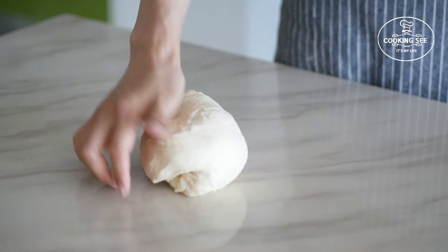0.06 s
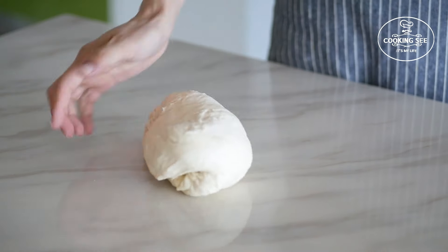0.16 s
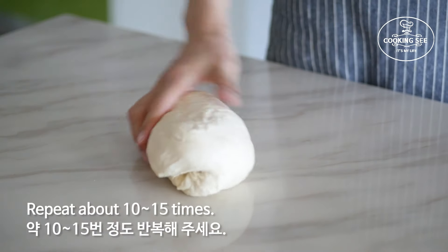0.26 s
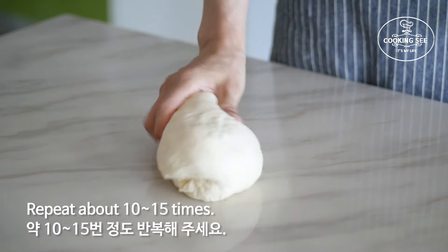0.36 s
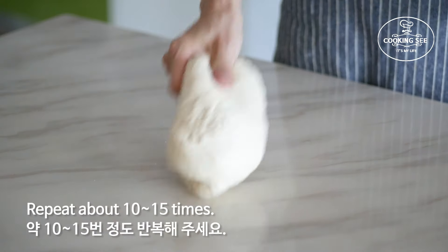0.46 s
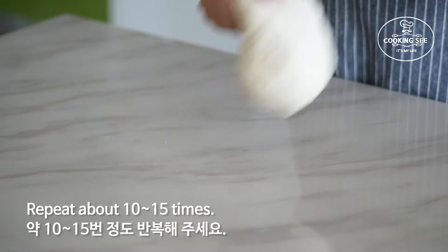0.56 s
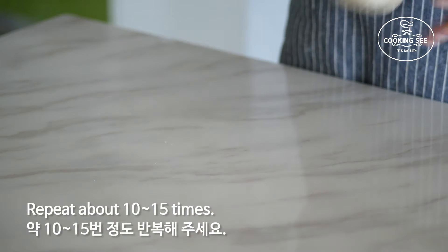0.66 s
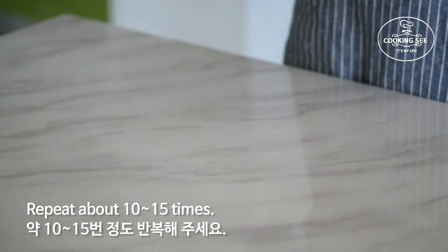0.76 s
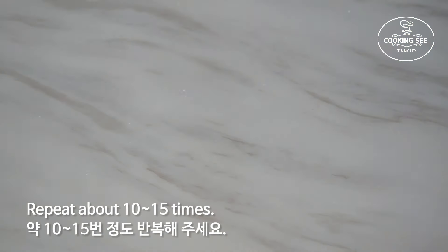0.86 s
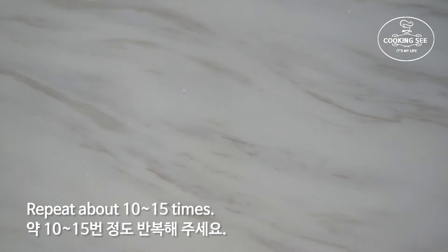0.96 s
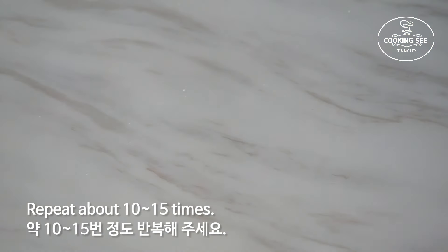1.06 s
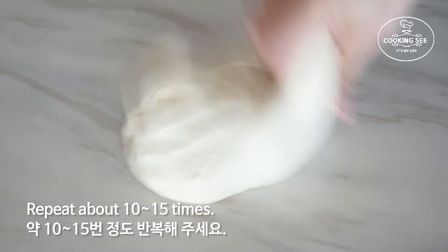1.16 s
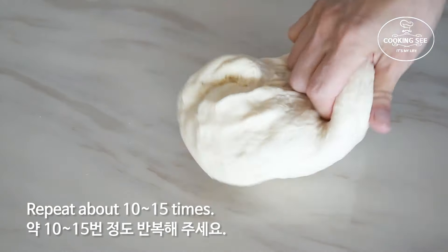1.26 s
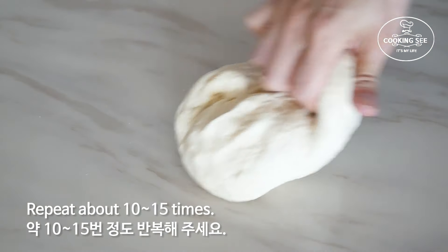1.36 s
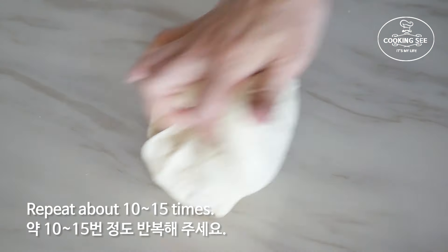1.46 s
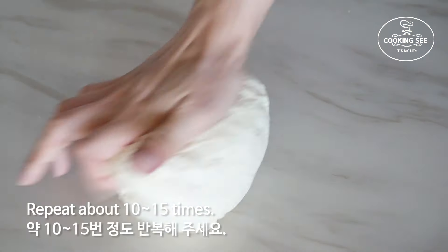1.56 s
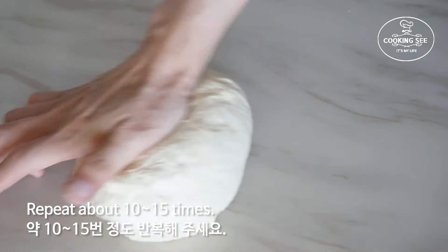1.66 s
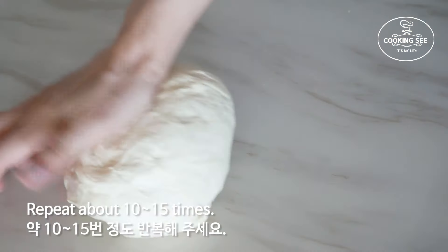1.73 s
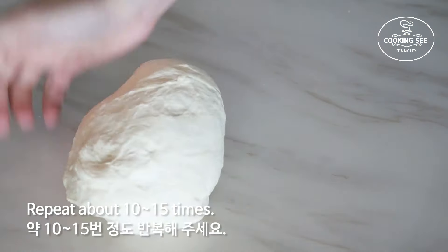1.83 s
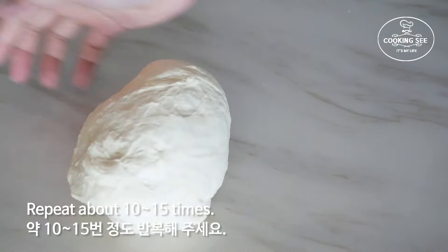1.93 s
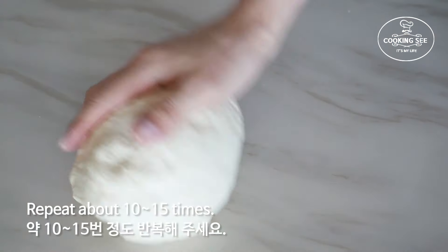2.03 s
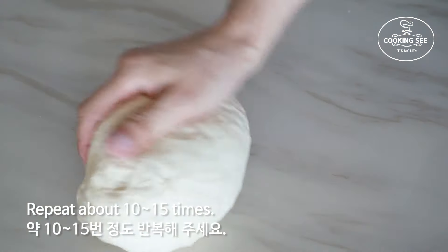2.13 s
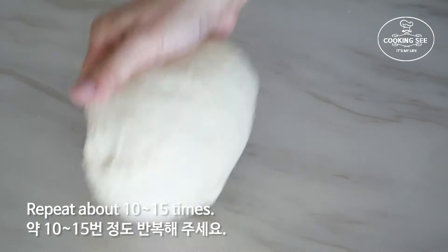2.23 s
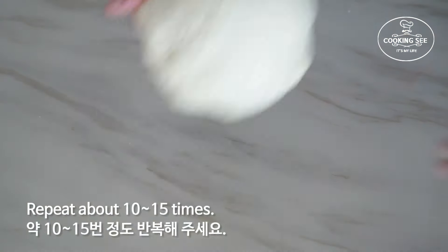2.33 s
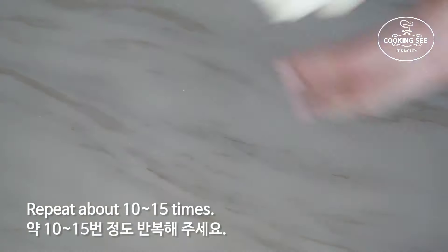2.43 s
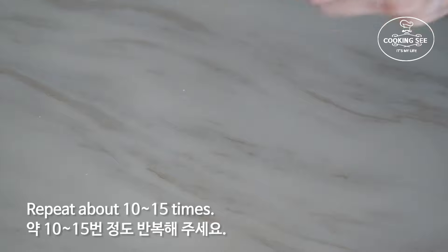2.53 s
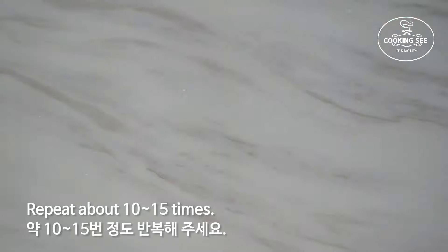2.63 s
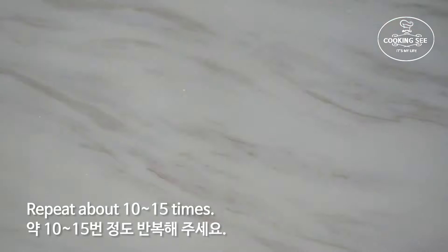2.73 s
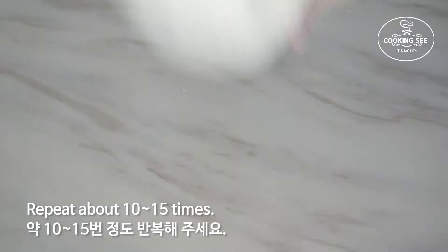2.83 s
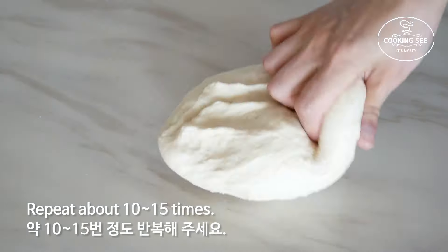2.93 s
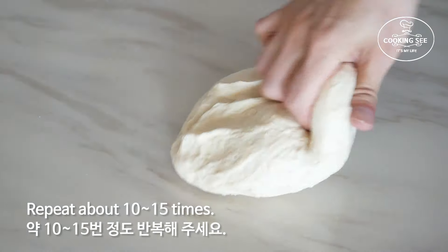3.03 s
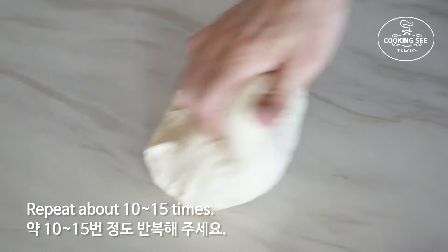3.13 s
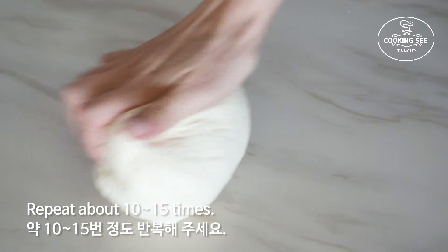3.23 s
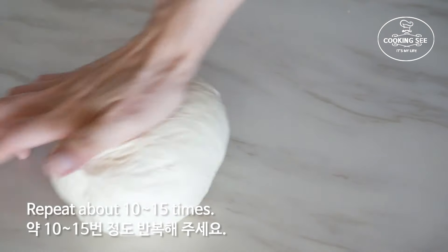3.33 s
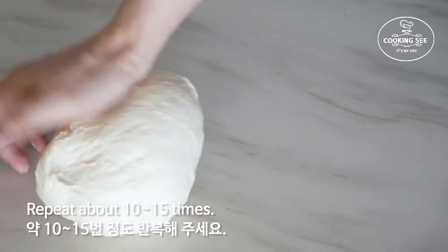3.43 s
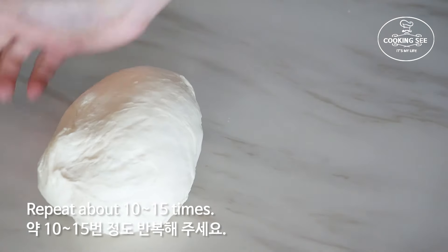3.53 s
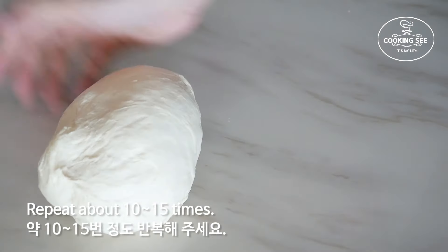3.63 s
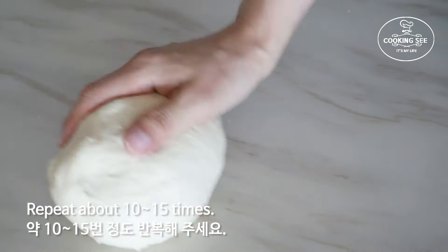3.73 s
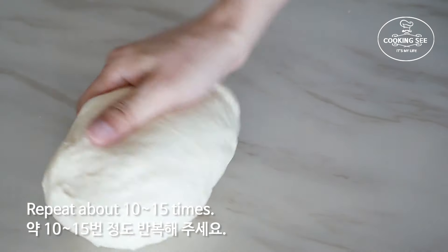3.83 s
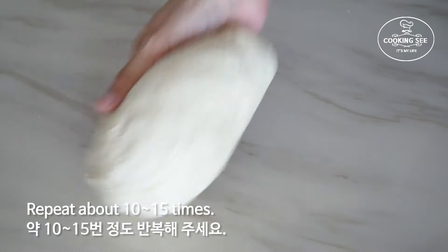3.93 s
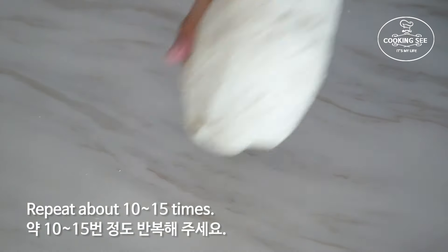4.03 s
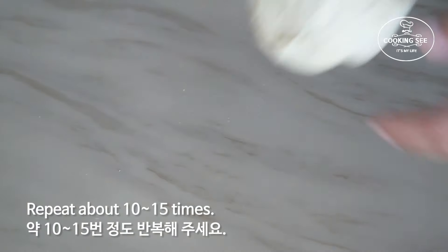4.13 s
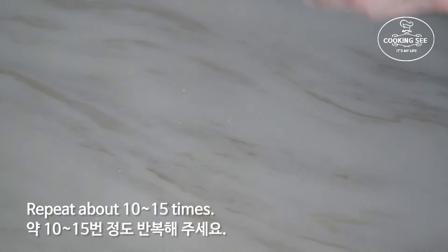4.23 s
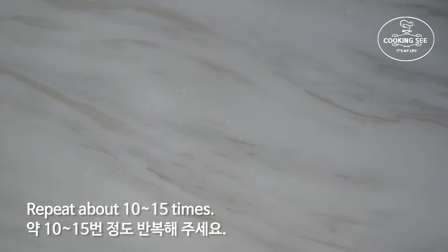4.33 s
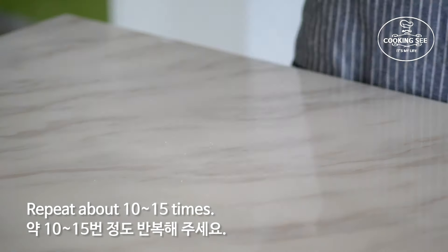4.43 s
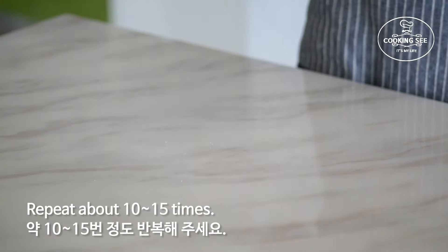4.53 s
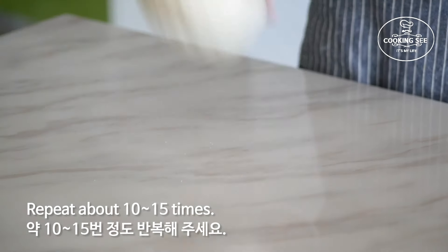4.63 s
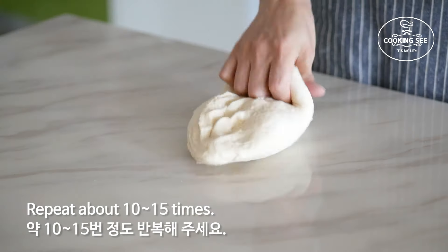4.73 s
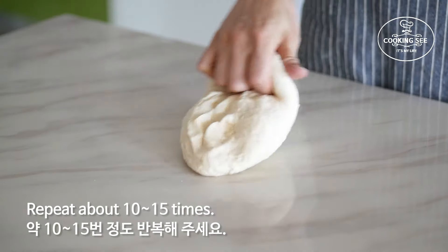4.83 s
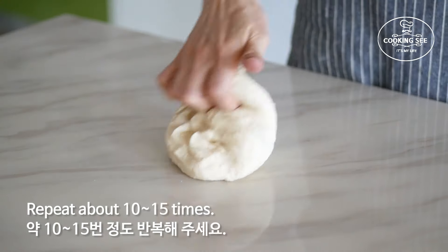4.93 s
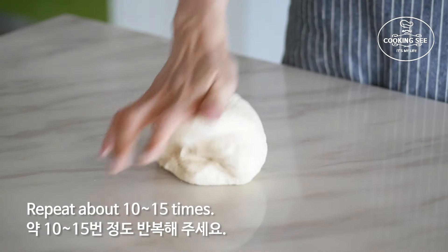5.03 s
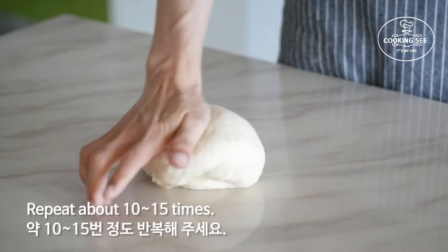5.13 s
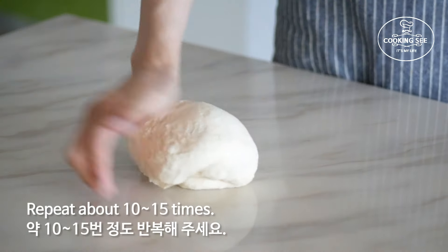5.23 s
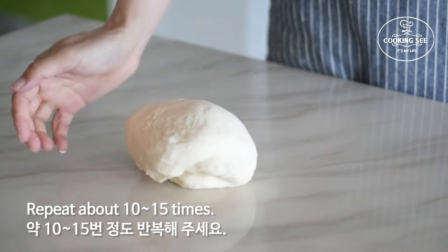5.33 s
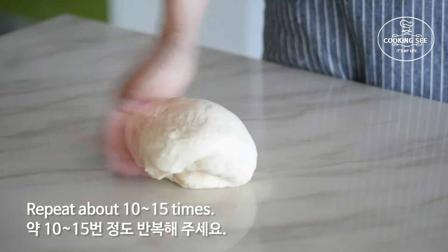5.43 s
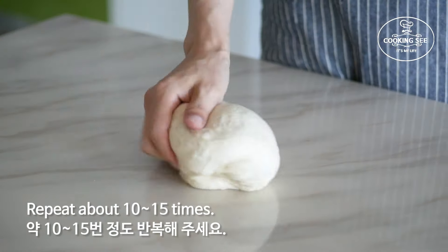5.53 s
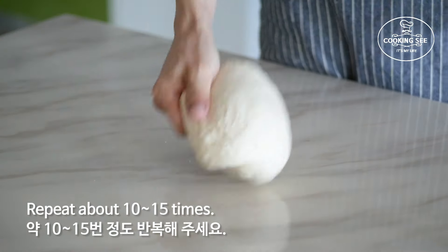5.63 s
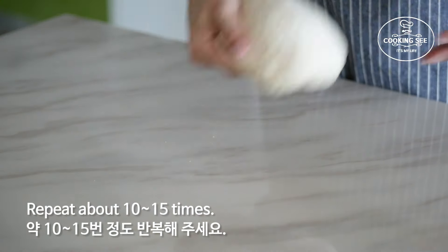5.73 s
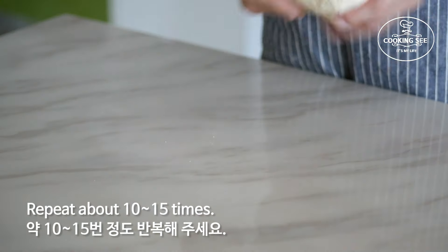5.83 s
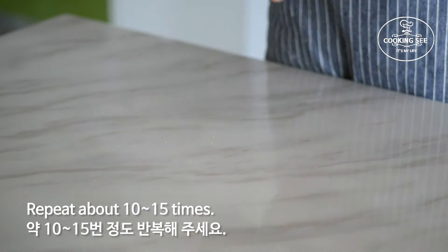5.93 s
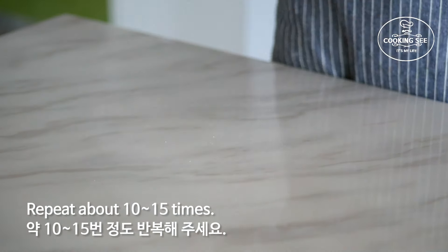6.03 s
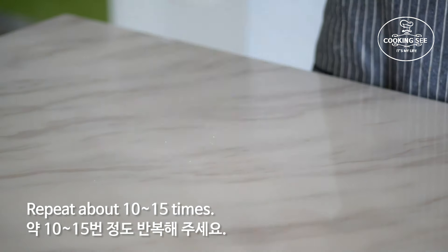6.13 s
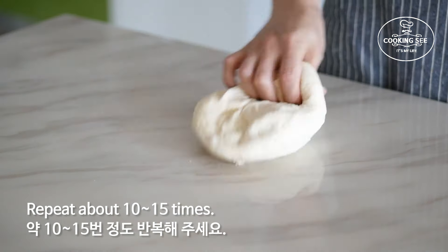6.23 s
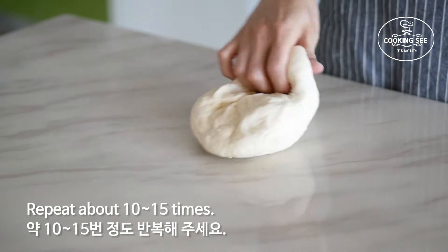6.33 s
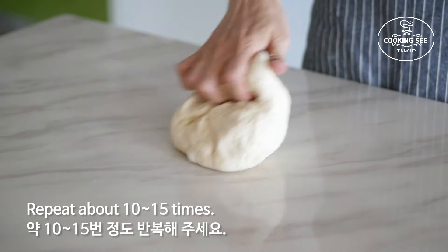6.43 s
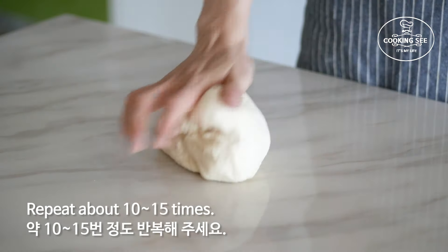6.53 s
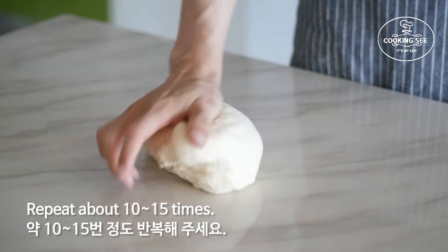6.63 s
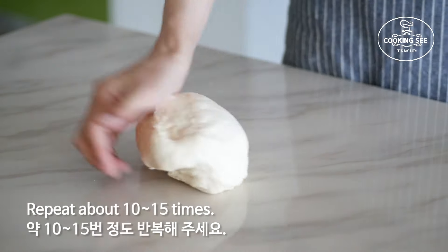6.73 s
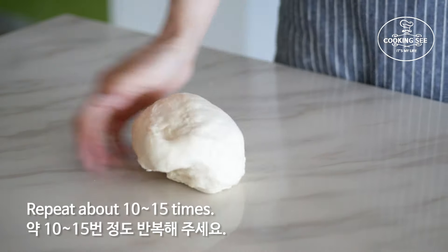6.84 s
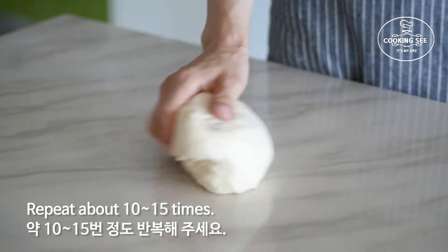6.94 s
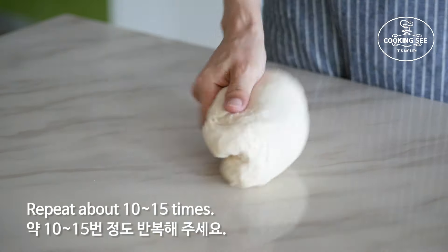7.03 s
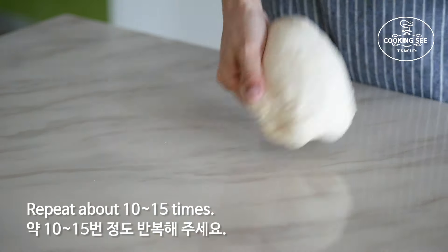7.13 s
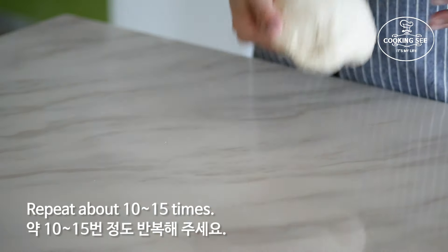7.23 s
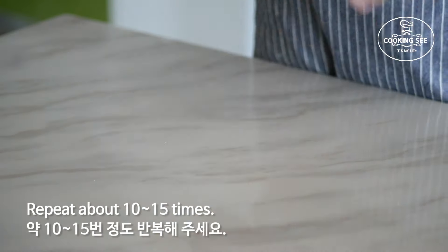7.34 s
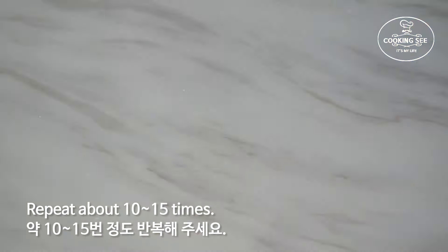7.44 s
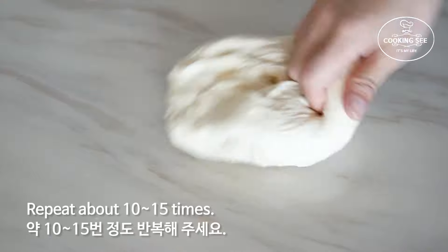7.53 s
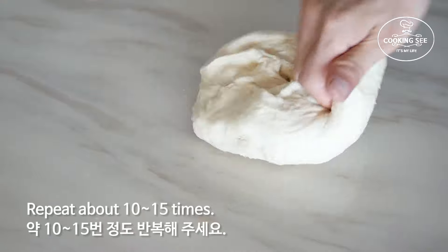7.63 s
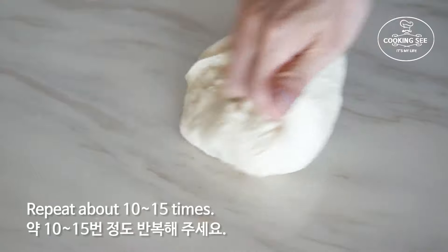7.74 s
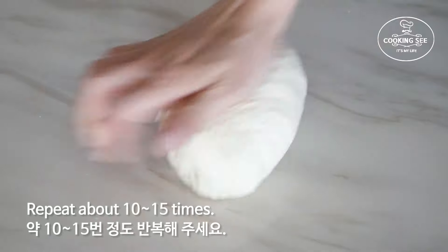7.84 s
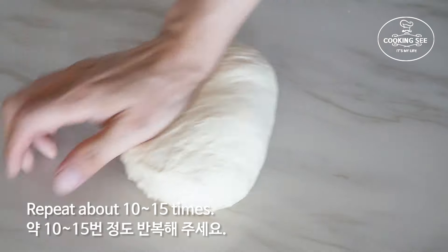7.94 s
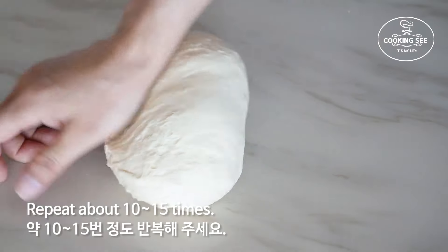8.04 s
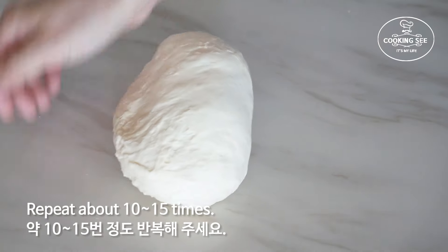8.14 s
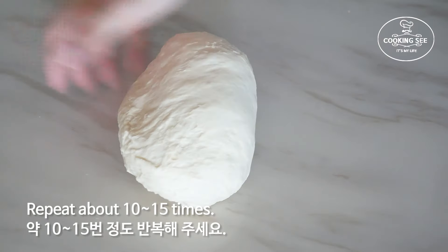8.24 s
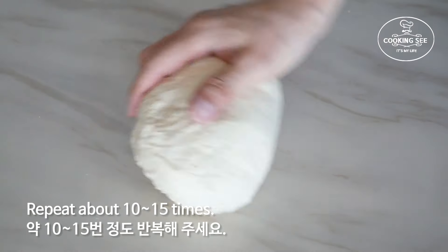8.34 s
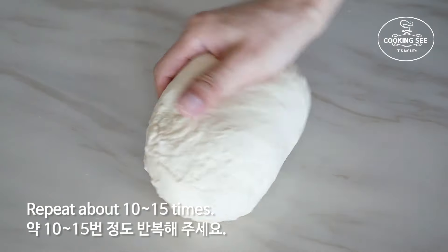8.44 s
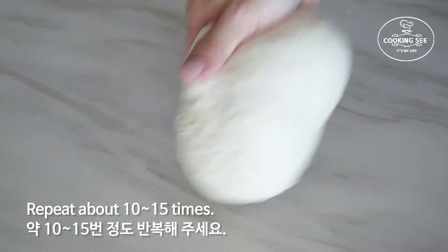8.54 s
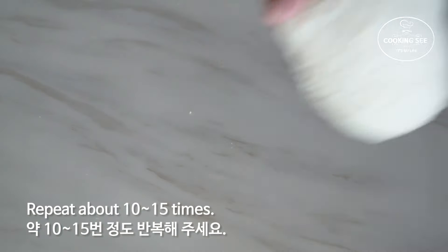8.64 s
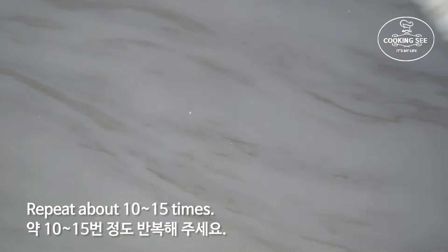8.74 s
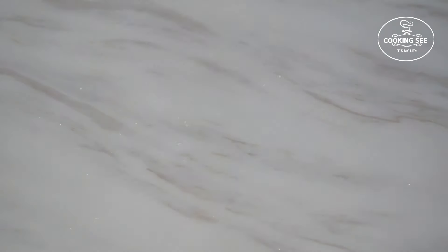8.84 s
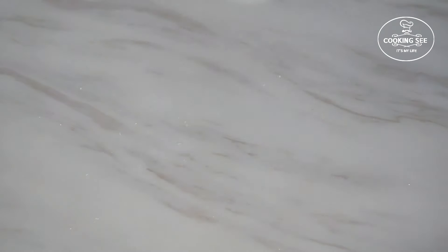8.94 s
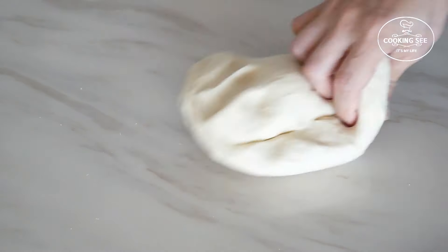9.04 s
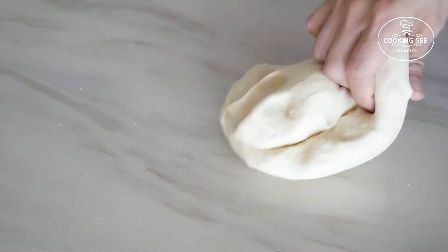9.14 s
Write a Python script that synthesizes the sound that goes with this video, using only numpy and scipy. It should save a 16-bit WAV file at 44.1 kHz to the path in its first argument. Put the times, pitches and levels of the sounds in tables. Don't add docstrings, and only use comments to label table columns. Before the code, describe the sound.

Quiet rubbing and small pats come first, then a loud wet-sounding smack of dough on stone. The cycle repeats to six slaps, the third and fourth brightest, the last softer. In between come dull drags, folding rustles, sticky fingertip ticks and one tiny peeling squeak. Hard walls echo each smack, cabinets resonate low, and a fridge hums faintly. The microphone is at arm's length.

```python
import sys
import numpy as np
from scipy import signal
from scipy.fft import rfft, irfft
from scipy.io import wavfile
from scipy.ndimage import uniform_filter1d

SR = 44100
rng = np.random.default_rng(int(sys.argv[2]) if len(sys.argv) > 2 else 0)


def ratio(d):
    e = np.asarray(d, float) / 20
    return 10 ** e


def store_wav(level_fs):
    pcm = np.round(np.clip(np.atleast_2d(level_fs), -1, 1) * 32767)
    wavfile.write(sys.argv[1], SR, pcm.T.astype(np.int16))


N = 404838
OPPOSED = np.array([[1], [-1]])

# (time [s], crackle [dB], crackle centre [Hz], knock [dB], knock [Hz])
SLAP_EVENTS = [
    (1.2491, -11, 2020, -4, 400),
    (2.958, -12, 2250, -1, 500),
    (4.7453, -6, 1620, -4, 500),
    (6.2607, -4, 2465, -4, 700),
    (7.5832, -9, 2200, -9, 400),
    (9.1654, -10, 1930, -13, 750),
]


def colour(x, points):
    hz, db = np.transpose(points)
    f = np.fft.rfftfreq(x.shape[-1], 1 / SR) + 1
    gain = ratio(np.interp(np.log(f), np.log(hz), db))
    return irfft(rfft(x) * gain, x.shape[-1])


def band(x, lo_hz, hi_hz):
    sos = signal.butter(2, [lo_hz, min(hi_hz, .45 * SR)], "band", fs=SR, output="sos")
    y = signal.sosfilt(sos, x)
    return y / np.std(y)


def walk(rate):
    k = int(SR / rate)
    levels = rng.standard_normal(N // 32)
    held = levels[np.arange(N) // k]
    return 1.27 * uniform_filter1d(uniform_filter1d(held, k), k)


def swell(t, rise):
    u = np.maximum(t, 0) / rise
    return u * np.exp(1 - u)


def ring(t, hz, rise):
    return np.sin(2 * np.pi * hz * t) * swell(t, rise)


def add(out, s, sound):
    i = int(s * SR)
    out[..., i:i + sound.shape[-1]] += sound[..., :N - i]


def pan(db):
    return ratio(np.array([[db / 2], [-db / 2]]))


def kitchen():
    # (frequency [Hz], level [dB])
    air_colour = [(15, -56.5), (25, -24.5), (65, -11.5), (213, -1), (348, -6), (567, -6.5), (615, -15.5),
                  (685, -11.5), (828, -10), (1630, -22), (6880, -32), (8090, -34), (9790, -31.5),
                  (14700, -42.5), (16400, -68.5)]
    # (frequency [Hz], level [dB])
    motor_lines = [(220.7, -57.5), (446.8, -76), (619.1, -63), (737.5, -71.5), (834.4, -74.5)]
    mid, side = colour(rng.standard_normal((2, N)), air_colour)
    air = (mid + side * OPPOSED) / np.std(mid) * ratio(-56 + 0.8 * walk(1.3))
    t = np.arange(N) / SR
    hum = 0
    for hz, db in motor_lines:
        hum = hum + ratio(db - 2.0 + 2.5 * walk(3)) * np.sin(2 * np.pi * hz * t + 1.7 * walk(6.2))
    return air + hum


def room():
    # (frequency [Hz], T60 [s])
    decay_times = [(80, 1), (210, 0.84), (560, 0.76), (1470, 0.74), (3880, 0.66), (10200, 0.59)]
    # (frequency [Hz], level [dB])
    tail_colour = [(60, 0.5), (120, -4.5), (250, 0.5), (500, -4.5), (1000, 0.5), (2000, 0.5), (4000, 0),
                   (8000, 0), (14000, -1)]
    # (frequency [Hz], level [dB])
    width = [(100, -11), (1000, -7), (4000, -10.5), (8000, -8.5), (14000, -5.5)]
    # (frequency [Hz], level [dB], T60 [s])
    cabinet_rings = [(148, -63.5, 1.1), (149, -51.5, 0.8), (219, -57, 0.4), (232, -58.5, 0.8),
                     (281, -64.5, 1.5), (286, -64.5, 1.1), (367, -73, 0.53), (457, -64.5, 0.82),
                     (593, -63, .6), (764, -69.5, 1.8)]
    tail_db, onset_s = -0.5, 0.0039
    t = np.arange(5 * SR // 4) / SR
    mid, side = rng.standard_normal((2, len(t)))
    noise = mid + colour(side, width) * OPPOSED
    hz, t60 = np.transpose(decay_times)
    tail = 0
    for centre in 45 * 2 ** np.arange(0, 8.6, .5):
        decay = ratio(-60 * t / np.interp(np.log(centre), np.log(hz), t60))
        tail = tail + np.sqrt(centre) * band(noise, centre / 2 ** .25, centre * 2 ** .25) * decay
    tail = colour(tail, tail_colour) * (1 - np.exp(-t / onset_s))
    tail *= ratio(tail_db) / np.sqrt(np.sum(tail ** 2) / 2)
    for ring_hz, db, ring_t60 in cabinet_rings:
        tail += ratio(db) * np.sin(2 * np.pi * ring_hz * t) * ratio(-60 * t / ring_t60)
    return tail


def walls():
    # (delay [ms], level [dB])
    echoes = [(3.6, -11), (5.4, -5), (7.6, -12.5), (9.5, -19), (16.3, -10.5), (17.6, -15), (19, -13.5),
              (23, -15)]
    # (frequency [Hz], level [dB])
    wall_colour = [(100, -13), (400, -10.5), (1200, -7), (3500, -2), (9000, 0), (15000, 2.5)]
    out = np.zeros((2, 2048))
    for ms, db in echoes:
        lag = ((ms + .018 * rng.standard_normal(2)) * SR / 1000).astype(int)
        out[[0, 1], lag] += ratio(db)
    return colour(out, wall_colour)


def bowl():
    # (time [s], level [dB], T60 [s], length [s])
    strikes = [
        (4.748, -43, 2.2, 0.72),
        (7.585, -40, 1.5, .8),
    ]
    bowl_hz = 1424
    out, t = np.zeros(N), np.arange(SR) / SR
    for s, db, t60, length in strikes:
        stop = np.clip((length - t) / .12, 0, 1)
        add(out, s, ratio(db - 60 * t / t60) * np.sin(2 * np.pi * bowl_hz * t) * stop)
    return out


def brushes():
    # (time [s], level [dB], half length [ms], centre [Hz])
    passes = [(2.07, -67, 10, 9000), (2.635, -61.5, 32, 10000), (4.47, -57.5, 47, 7000),
              (5.08, -50.5, 25, 8900), (5.29, -58, 30, 9000), (6.02, -59, 54, 9000), (6.6, -55, 18, 6000),
              (7.145, -57.5, 49, 10500), (7.565, -59, 12, 6000)]
    out, ms = np.zeros((2, N)), np.arange(-4096, 4096) / SR * 1000
    for s, db, half_ms, hz in passes:
        mid, side = band(rng.standard_normal((2, len(ms))), hz / 3.1, hz * 1.27)
        air = mid + 0.37 * side * OPPOSED
        add(out, s + ms[0] / 1000, ratio(db) * air * np.exp(-(ms / half_ms) ** 2))
    return out


def rubs():
    # (time of the top [s], hiss [dB], rise by 20 dB [ms], fall by 20 dB [ms], rumble re hiss [dB])
    slides = [(0.142, -53, 402, 93, 7), (0.536, -49.5, 105, 53, 4.5), (0.928, -53, 190, 22, -12),
              (1.868, -50, 210, 53, 4.5), (2.31, -48, 90, 70, 5.5), (3.4, -54, 105.5, 399, 6.5),
              (3.544, -48, 70, 37, -15), (3.978, -55, 50, 50, 11), (4.294, -60, 51, 158.5, 0),
              (4.474, -54.5, 149.5, 109, -4), (5.13, -52.5, 60, 298.5, 15), (5.288, -52.5, 53, 79.5, -15),
              (5.7, -53.5, 148, 70, 5.5), (6.104, -54, 300, 37, -7), (6.6, -58, 40, 80, 20),
              (7.0, -53.5, 50, 342, 6), (7.57, -49.5, 39, 12, 5), (7.98, -65.5, 53, 80, 18.5),
              (8.142, -58, 52, 90, 1), (8.596, -56, 300, 143.5, 6.5), (8.846, -63, 50, 149.5, -3),
              (9.114, -58, 180, 150, -8)]
    # (time of the top [s], hiss [dB], rise by 20 dB [ms], fall by 20 dB [ms], rumble re hiss [dB])
    drags = [(0.328, -44.5, 58, 70, 5.5), (0.788, -47, 0, 80, 8), (1.6, -64.5, 100, 120, 16),
             (1.67, -52, 6, 71, 13), (2.092, -45.5, 30, 96, 11), (2.548, -46.5, 14, 148.5, 5.5),
             (3.768, -41.5, 30.5, 80.5, 10.5), (4.008, -47, 12, 102, -4), (4.74, -37.5, 5, 4, 4),
             (5.498, -51, 35, 39, 8), (5.528, -42.5, 48.5, 90, 0), (5.902, -49.5, 22, 122, 3.5),
             (6.82, -53, 145.5, 60, -3), (6.936, -38.5, 12.5, 52, 0), (7.432, -45, 11, 16, -8),
             (8.062, -51.5, 67, 123, 17), (8.366, -46, 44, 106, 5)]
    slide_air_db, drag_air_db = -2, -6
    linger, resting_db = 1.11, -66
    ms = np.arange(N) / SR * 1000
    levels = np.zeros((3, N))
    levels[1] = ratio(resting_db - 5)
    for strokes, air_db in ((slides, slide_air_db), (drags, drag_air_db)):
        for s, db, rise_ms, fall_ms, low_db in strokes:
            near = slice(max(int((s - .6) * SR), 0), int((s + .7) * SR))
            late = ms[near] - 1000 * s
            fade_db = -20 * np.maximum(-late / rise_ms, late / fall_ms)
            shapes_db = np.array([fade_db - 3.5, fade_db / linger + low_db - 8, fade_db + air_db - 8.5])
            levels[:, near] += ratio(db + shapes_db)
    grain = rng.standard_normal(N) * ratio(3.2 * walk(400) + 2.3 * walk(45))
    shake = rng.standard_normal(N)
    rumble = (.62 * band(shake, 160, 370) + .72 * band(shake, 380, 850)) * ratio(4.2 * walk(30))
    layers = np.array([band(grain, 990, 5600), rumble, band(grain, 3400, 10000)])
    levels = uniform_filter1d(levels, int(0.0052 * SR), axis=1)
    return pan(1.4) * np.sum(levels * layers, axis=0)


def squeak():
    # (from [Hz], to [Hz], glide [ms], length [ms], level [dB])
    from_hz, to_hz, glide_ms, length_ms, db = (4800, 3401, 8.5, 25.5, -35)
    # (frequency [Hz], level [dB])
    squeak_colour = [(2500, -29.5), (3550, -3), (4300, 0), (5300, -2), (6200, -10), (7500, -9),
                     (9500, -9.5), (11500, -16), (13500, -12), (16000, -25)]
    upper_hz, lowest_ms, bend_hz_per_ms2 = 5050, 10.5, 3.6
    ms = np.arange(2048) / SR * 1000
    falling_hz = to_hz + (from_hz - to_hz) * np.exp(-ms / glide_ms)
    bending_hz = upper_hz + bend_hz_per_ms2 * (np.minimum(ms, length_ms) - lowest_ms) ** 2
    shape = np.clip(ms / 0.45, 0, 1) * np.clip((length_ms - ms) / 8, 0, 1)
    rough = band(rng.standard_normal((2, len(ms))), 100, 900)
    phase = 2 * np.pi * np.cumsum([falling_hz, bending_hz], axis=1) / SR
    lower, upper = np.sin(phase + .25 * rough[::-1]) * (1 + .45 * rough)
    both = lower + ratio(-2.5) * upper
    mixed = both + ratio(-6) * both ** 2 + ratio(-14) * both ** 3
    return pan(1.9) * ratio(db) * colour(mixed * shape, squeak_colour)


def pats():
    # (time [s], tick [dB], tick [Hz], thud re tick [dB], knock re tick [dB])
    hand_pats = [(0.048, -32.5, 1500, -4.5, -3.5), (0.2836, -48, 2050, 0, -6), (0.305, -45, 2050, 9, -8),
                 (1.7543, -34.5, 1690, -2, -0.5), (2.057, -47.5, 2030, 3.5, -13),
                 (2.0976, -30, 3400, -7.5, -8), (2.5454, -32, 1930, -14.5, -5),
                 (2.5653, -34.5, 2920, 1, -18), (3.382, -36, 5100, -3.5, 0), (3.4185, -44.5, 3730, 5.5, -1),
                 (3.73, -44, 3300, 3, -1), (3.7588, -26, 2750, -7.5, -2), (5.1593, -31, 1705, -2, 3.5),
                 (5.468, -55, 2040, 4, 2), (5.496, -50, 2000, 14, 0), (5.5052, -20, 2450, -14, -14),
                 (5.517, -40, 3000, 12, 2), (5.897, -33.5, 2010, -8.5, -4.5),
                 (6.9367, -25.5, 2430, -9.5, -14), (8.0346, -40, 950, -6, -9), (8.0402, -43, 1710, 6, -6),
                 (8.0606, -38, 1500, 9, -2), (8.3484, -48, 1990, 8, -8), (8.358, -44, 2010, 10, -10),
                 (8.6004, -45, 1940, -8, -2)]
    # (time [s], tick [dB], tick [Hz], left minus right [dB])
    fingertips = [(0.1289, -42, 5340, 0), (0.3199, -31, 2140, 6), (0.787, -32, 2670, -2),
                  (0.891, -46, 4480, 3), (1.5264, -40, 1200, 2), (1.5758, -39, 1100, 2),
                  (1.6506, -42, 1150, 2), (1.6681, -38, 1850, 2), (2.2613, -43, 1740, 2),
                  (3.9719, -42, 1220, 2), (5.6989, -41, 1160, 2), (4.0046, -38, 2300, 2),
                  (6.096, -42, 3770, 2.5), (7.428, -39.5, 5800, 0), (8.142, -42, 2400, 2),
                  (8.1465, -43, 3800, 2), (8.1545, -45, 3600, 2), (8.1625, -46, 3600, 2),
                  (8.3689, -36, 2270, 2), (8.4753, -37.5, 6510, -1)]
    touches = [(*pat, 3.5) for pat in hand_pats]
    for s, db, hz, pan_db in fingertips:
        touches.append((s, db, hz, -14.5, -15, pan_db))
    touches.sort()
    out, t = np.zeros((2, N)), np.arange(2560) / SR
    for s, db, hz, thud_db, knock_db, pan_db in touches:
        noise = rng.standard_normal((4, len(t)))
        tick = 0.55 * band(noise[0], hz / 1.4, hz * 1.1) * swell(t, 0.00031) + .7 * ring(t, hz, 0.00028)
        rustle = 0.15 * band(noise[1], 1500, 8300) * (swell(t, 0.0016) + 0.49 * swell(t, 0.0091))
        thud = ratio(thud_db - 2.0) * band(noise[2], 170.4, 330) * swell(t, 0.0056)
        knock = ratio(knock_db - 9.5) * band(noise[3], 520, 1350) * swell(t, .0065)
        add(out, s, ratio(db) * pan(pan_db) * (tick + rustle + thud + knock))
    return out


def slaps():
    # (delay [ms], snap [dB], snap [Hz], rim landing first [dB])
    snaps = [(1.0, -10, 2000, -10), (1.3, -9, 2600, -9), (2.9, 0, 1900, -7), (2.0, -1, 2700, -6),
             (1.6, -4, 2600, -18), (1.5, -12, 2400, -5)]
    # (delay [ms], level [dB], frequency [Hz], rise [ms])
    thumps = [(1.7, 0, 315, 1.7), (1.4, -2.5, 320, 1.1), (2.2, -5, 240, 1.6), (1.8, -4, 245, 2.2),
              (2.0, 2, 300, 1.1), (1.8, -12, 215, 2.4)]
    # (frequency [Hz], level [dB])
    overtones = [(560, -13), (950, -8), (560, -7), (800, -14), (760, -14), (1000, -22)]
    # (level at the far walls [dB], treble [dB], left minus right [dB])
    landings = [(11.5, -17, 2), (14.5, -16, 1), (16, -17.5, 1), (13, -17.5, 2.5), (14.56, -16.5, 2.5),
                (11.5, -17.5, 5.5)]
    # (frequency [Hz], level [dB])
    clap_1 = [(59, -65), (100, -36), (140, -7.5), (181, -17.5), (218, -4), (270, -3), (640, -7.5),
              (742, -5.5), (825, -12), (1960, -20.5), (6810, -24), (13700, -35.5), (15500, -43)]
    # (frequency [Hz], level [dB])
    clap_2 = [(59, -65.5), (100, -33), (146, -5.5), (188, -7.5), (326, -3.5), (447, -1), (497, -2),
              (861, -7.5), (1210, -16.5), (1800, -15), (2200, -11), (2800, -11), (3400, -19), (9950, -22.5),
              (15500, -55)]
    # (frequency [Hz], level [dB])
    clap_3 = [(59, -65), (100, -39), (143, -5.5), (184, -12), (275, -0.5), (313, -6), (400, -2),
              (497, -5.5), (742, 1.5), (1040, -12), (3180, -9.5), (4700, -13), (5750, -23), (6900, -17),
              (9540, -21), (15500, -51)]
    # (frequency [Hz], level [dB])
    clap_4 = [(59, -69.5), (100, -45.5), (140, -4), (184, -15.5), (228, -3.5), (640, -11.5), (712, -12.5),
              (1520, -16), (2270, -13.5), (4370, -15), (5070, -21), (10200, -23), (15500, -49)]
    # (frequency [Hz], level [dB])
    clap_5 = [(59, -82), (100, -43.5), (140, -9), (184, -11.5), (275, -3.5), (614, -7.5), (712, -9),
              (1340, -16.5), (1430, -16), (5870, -19.5), (9950, -25.5), (13000, -40), (15500, -60)]
    # (frequency [Hz], level [dB])
    clap_6 = [(59, -60), (100, -40), (200, -4), (400, -11), (560, -22), (900, -16), (1600, -18),
              (3500, -14), (10200, -22), (15500, -45)]
    claps = [clap_1, clap_2, clap_3, clap_4, clap_5, clap_6]
    near, far, t = np.zeros((2, N)), [], np.arange(2048) / SR
    for slap, snap, thump, overtone, clap, landing in zip(SLAP_EVENTS, snaps, thumps, overtones, claps, landings):
        s, crackle_db, crackle_hz, knock_db, knock_hz = slap
        snap_ms, snap_db, snap_hz, rim_db = snap
        thump_ms, thump_db, thump_hz, rise_ms = thump
        over_hz, over_db = overtone
        clap_db, top_db, pan_db = landing
        noise = rng.standard_normal((3, len(t)))
        late = t - snap_ms / 1000
        crackle = band(noise[0], crackle_hz / 2.6, crackle_hz * 1.63) * swell(t, 0.0012)
        crackle *= ratio(crackle_db - 6.5)
        treble = band(noise[1], 4000, 11500) * (swell(t, 0.0007) + 1.8 * swell(late + .0004, 0.0003))
        treble *= ratio(top_db - 6.5)
        burst = ratio(snap_db) * np.cos(2 * np.pi * snap_hz * late) * np.exp(-(late / .0003) ** 2)
        burst -= ratio(rim_db) * ring(t, 2100, .00016)
        body = ratio(knock_db) * ring(t - .00035, knock_hz, .00055)
        body -= ratio(thump_db) * ring(t - thump_ms / 1000, thump_hz, rise_ms / 1000)
        body -= ratio(over_db) * ring(late, over_hz, .0012)
        add(near, s, pan(pan_db) * (crackle + treble + burst) + pan(pan_db + .3) * body)
        rush = ratio(-52) * band(noise[2], 500, 3800) * ratio(-700 * t[::-1])
        add(near, s - t[-1], pan(pan_db) * rush)
        click = np.roll(colour(1. * (t == 0), clap), 200)
        far.append(pan(1.2) * ratio(clap_db) * click / np.sqrt(np.sum(click ** 2)))
    return near, far


def scene():
    squeak_s = 4.0047
    near, claps = slaps()
    hand, whistle, peel, hall = pats() + rubs(), np.zeros((2, N)), squeak(), room()
    add(whistle, squeak_s, peel)
    echoes = signal.oaconvolve(near + ratio(-4.0) * hand + ratio(2.5) * whistle, walls(), axes=1)[:, :N]
    tail = signal.fftconvolve(ratio(-8) * hand, hall, axes=1)[:, :N]
    damped = hall * ratio(-1.5 - 45 * np.arange(hall.shape[1]) / SR)
    add(tail, squeak_s, signal.fftconvolve(peel, damped, axes=1))
    spots = 2 * [hall, room(), room()]
    for (s, *_), clap, spot in zip(SLAP_EVENTS, claps, spots):
        add(tail, s, signal.fftconvolve(clap, spot, axes=1))
    low_cut = signal.butter(2, 126, "high", fs=SR, output="sos")
    counter = signal.sosfilt(low_cut, near + hand + whistle + echoes + tail)
    return counter + bowl() + kitchen() + brushes()


def roll_off(x):
    return signal.sosfilt(signal.butter(12, 16540, fs=SR, output="sos"), x)


def record(dry):
    # (frequency [Hz], level [dB])
    right_port = [(100, -1), (3000, 0.5), (8000, 0), (13000, 4)]
    notch_hz, top_hz = 7860, 15000
    ports = [dry[0], colour(dry[1], right_port)]
    x = signal.lfilter(*signal.iirnotch(notch_hz, 60, SR), ports)
    x = signal.sosfilt(signal.cheby1(10, .5, top_hz, fs=SR, output="sos"), x)
    x = x / (1 + np.abs(x) ** 4) ** .25
    return roll_off(x)


dry = scene()
out = record(dry)
store_wav(out)
```